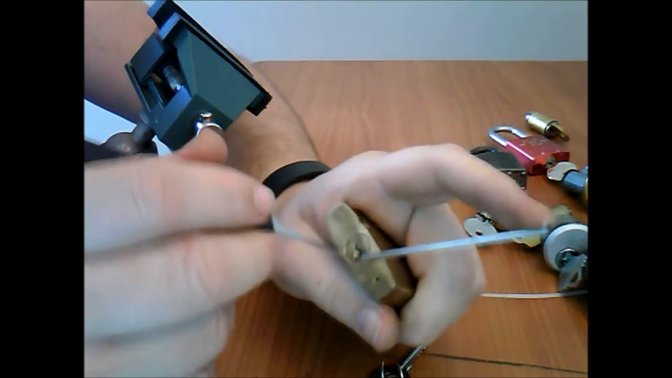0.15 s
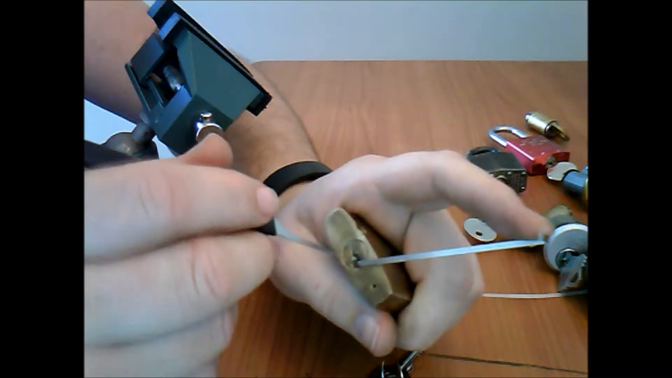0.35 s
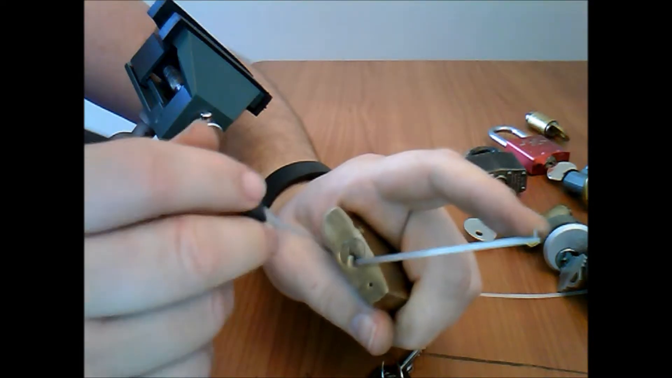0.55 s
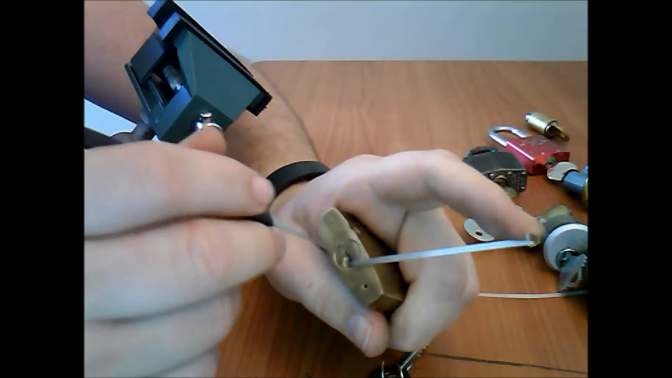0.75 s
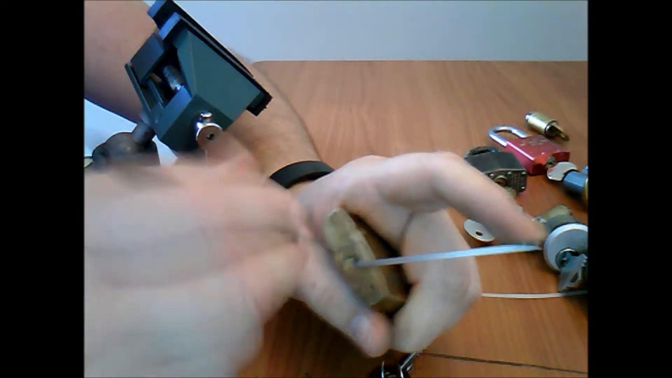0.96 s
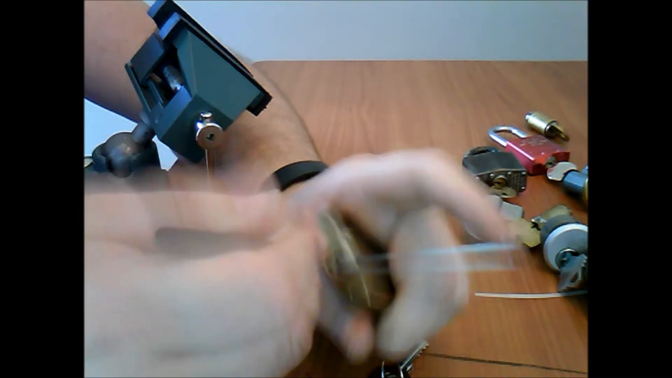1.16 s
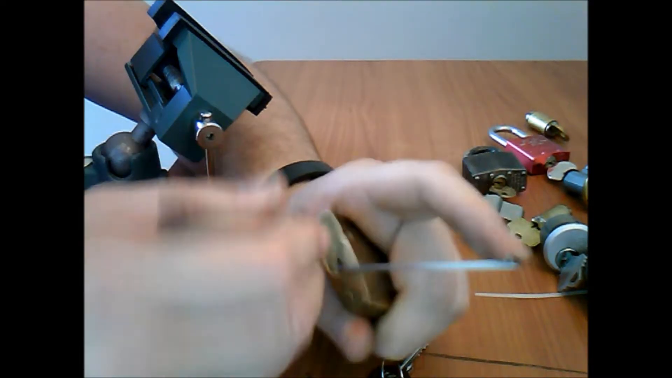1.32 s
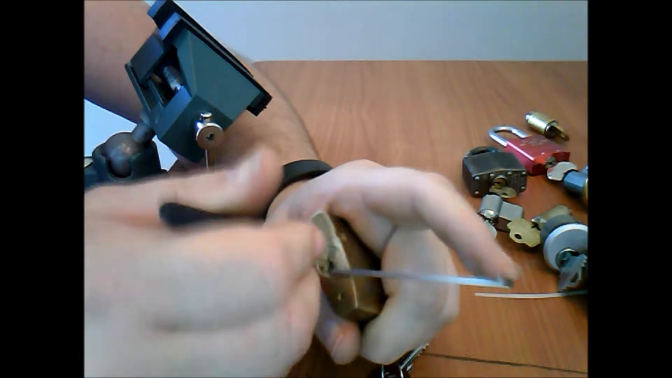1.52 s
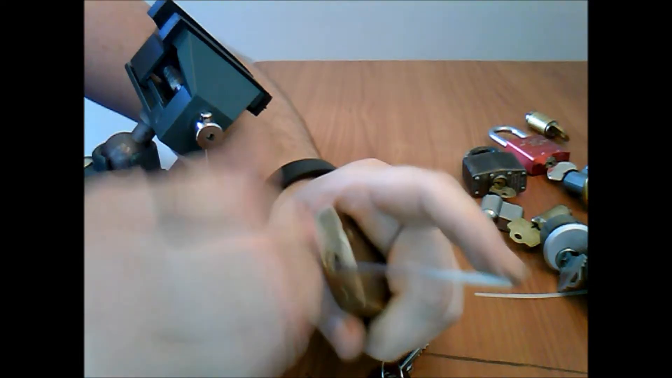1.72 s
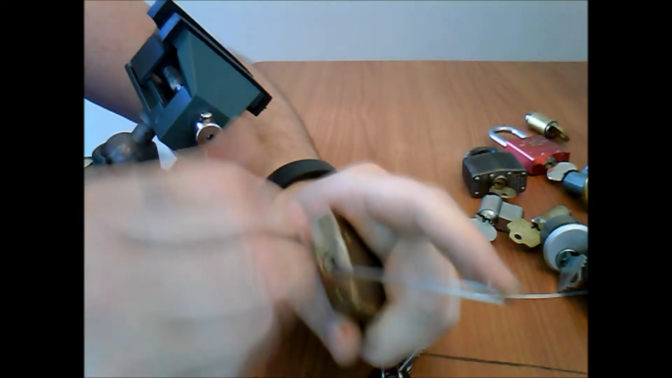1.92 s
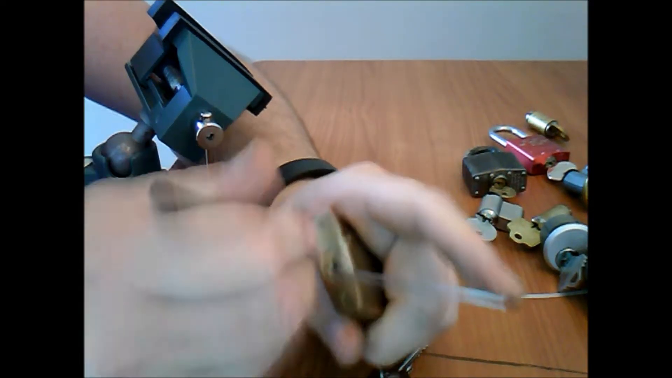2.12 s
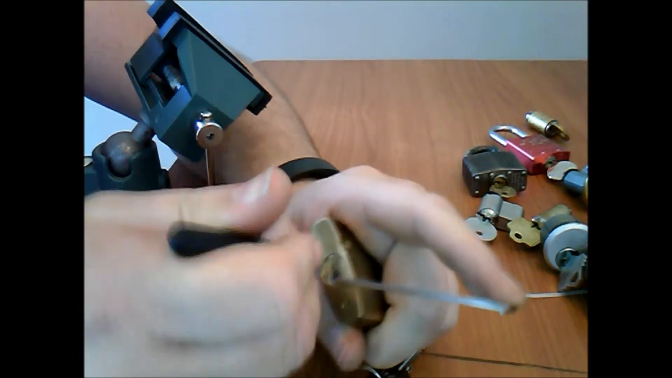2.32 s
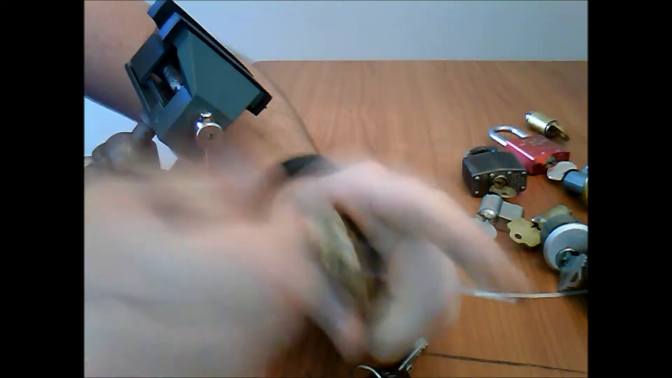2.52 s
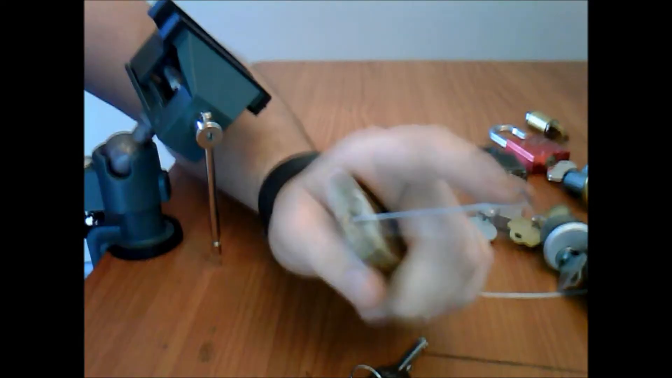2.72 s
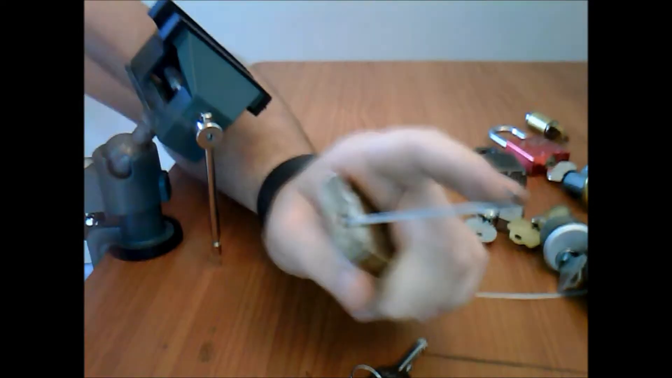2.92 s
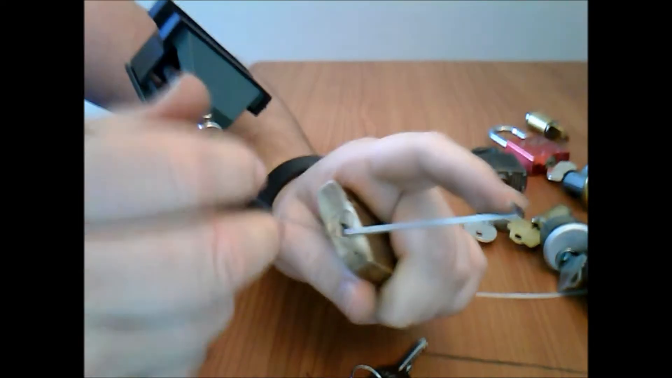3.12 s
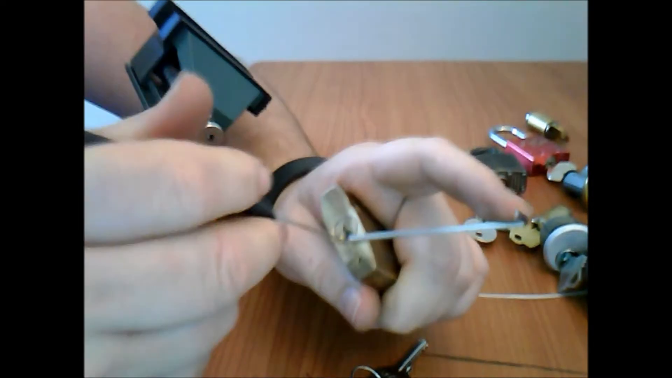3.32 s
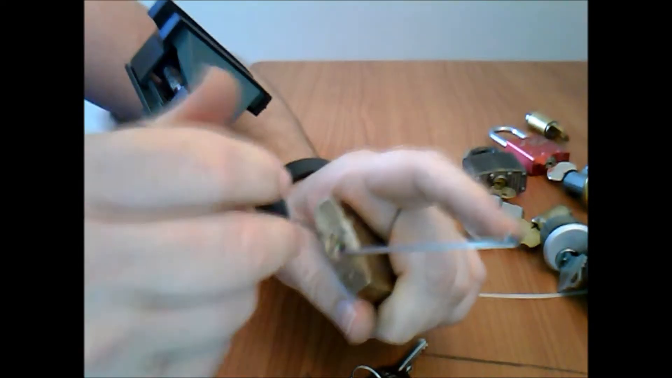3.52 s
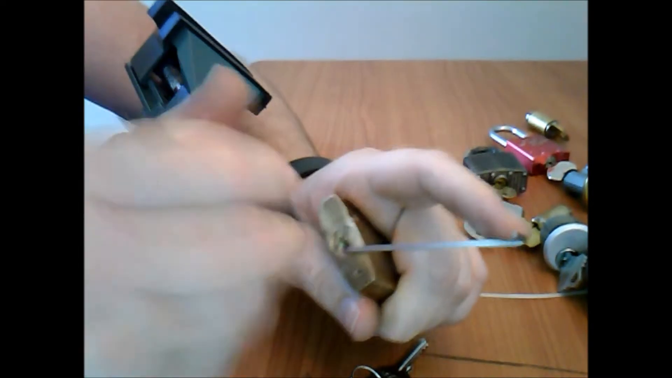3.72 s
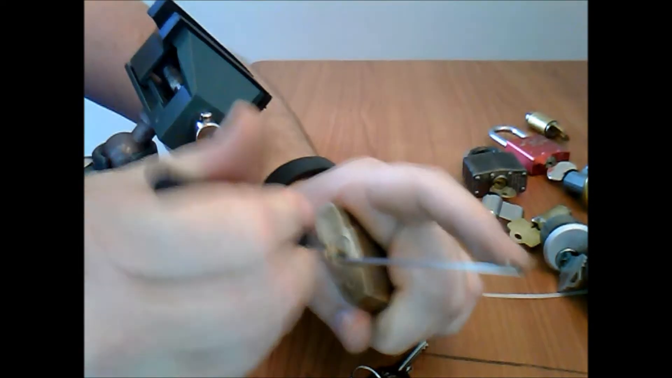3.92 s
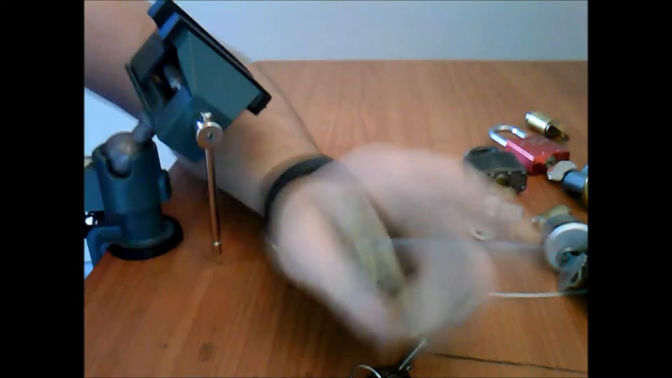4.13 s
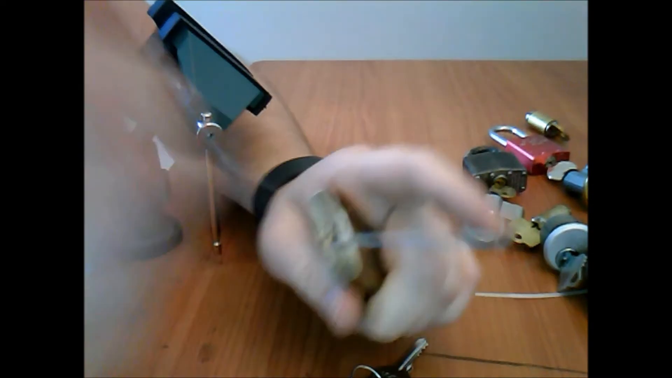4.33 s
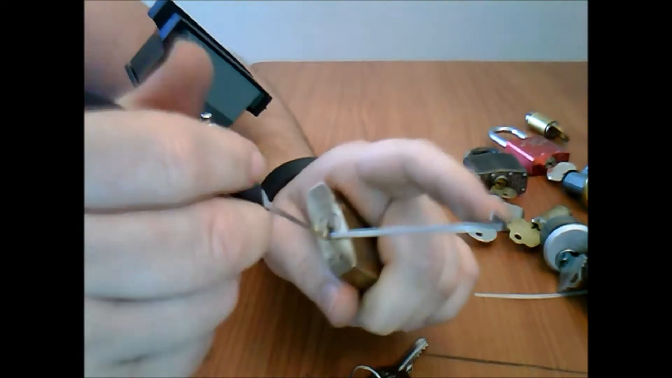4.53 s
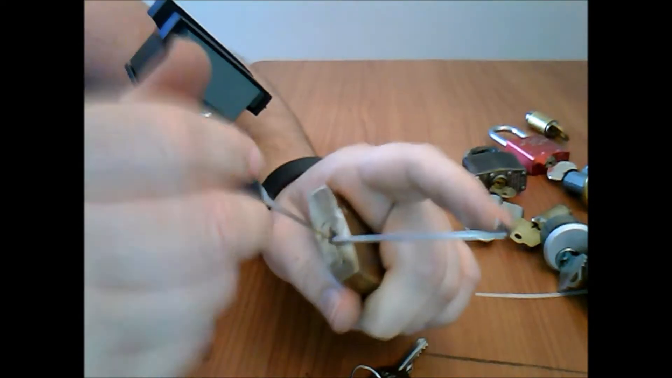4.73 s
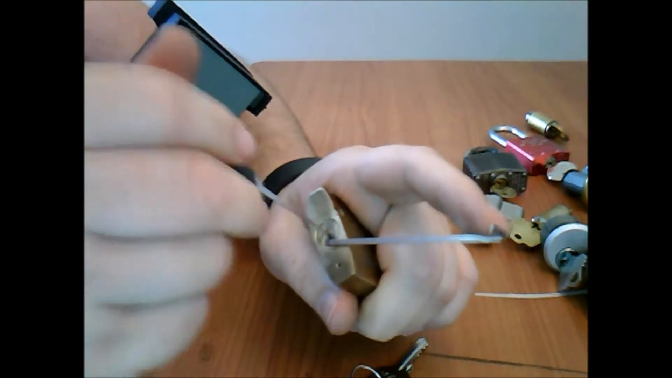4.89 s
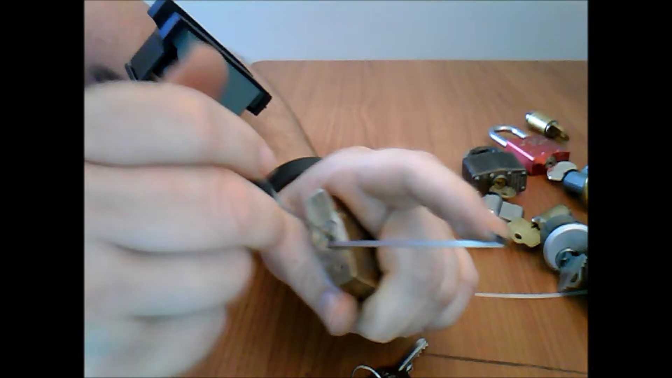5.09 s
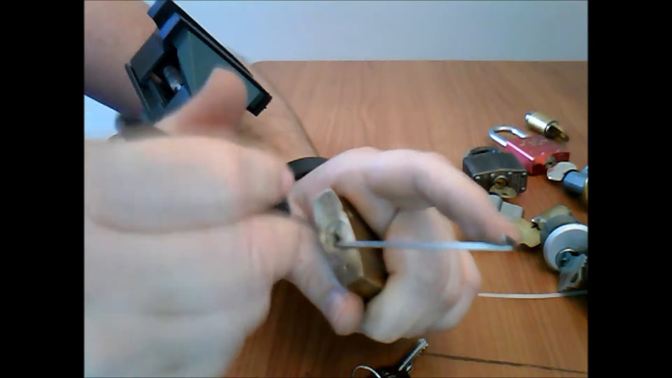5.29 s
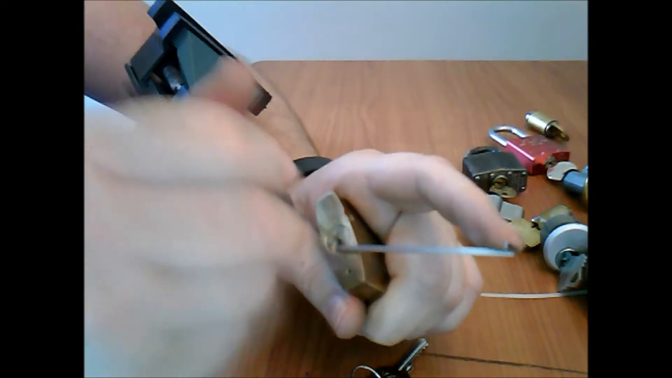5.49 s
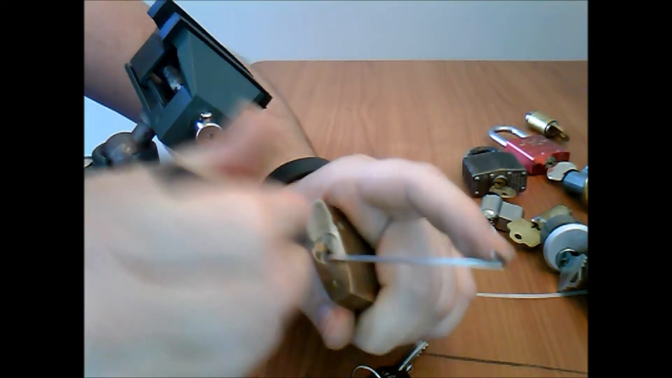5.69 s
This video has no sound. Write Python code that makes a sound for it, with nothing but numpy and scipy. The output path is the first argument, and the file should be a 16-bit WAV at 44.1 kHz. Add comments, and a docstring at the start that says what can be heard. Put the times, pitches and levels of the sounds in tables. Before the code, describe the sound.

A nearby camera microphone catches hands working a small padlock over a desk: sparse dry ticks, a violent split-second zip of steel across pins, then a cluster of low bumps and rubbing. More small clicks lead to another short zip and a soft thud, then light wrench ticks. Quiet room air, faint midrange hum and a fluttering electronic whine lie underneath, with a short room ring.

```python
"""A steel pick is ripped out across the pins of a small brass padlock: each zip is a 20 ms volley of hard snaps.
Light ticks of pick, pins and tension wrench surround the zips; every click is a noise rattle ringing metal modes.
Hands, lock and desk add damped, ringless knocks and a low rub; arm effort drives stand rumble and skin rub.
A small room rings after these sounds, over shaped noise for air, drone and rustle and a pulsing electrical whine."""
import sys
import numpy as np
from scipy import signal
from scipy.fft import rfft, irfft
from scipy.io import wavfile
from scipy.ndimage import uniform_filter1d

SR = 44100
rng = np.random.default_rng(int(sys.argv[2]) if len(sys.argv) > 2 else 0)


def store_pcm(level_fs):
    """Save levels as 16-bit WAV."""
    pcm = np.round(np.clip(level_fs, -1, 1) * 32767).astype(np.int16)
    wavfile.write(sys.argv[1], SR, np.atleast_2d(pcm).T)


N = 253575  # length in samples
SIZE = 16384  # samples in one strike or short rub
HZ = np.fft.rfftfreq(SIZE, 1 / SR)


def amp(db):
    """Decibels to gain."""
    return 10 ** (np.asarray(db) / 20)


def evened(x):
    """Scales to rms 1."""
    return x / np.sqrt(np.mean(x ** 2) + 1e-20)


def read(points, hz):
    """Reads a (Hz, value) table on a log-frequency axis."""
    f, value = np.transpose(points)
    return np.interp(np.log(hz + 1), np.log(f + 1), value)


def add(mix, s, sound):
    """Mixes a sound in at s seconds, cut off at the end of the mix."""
    part = mix[round(s * SR):][:len(sound)]
    part += sound[:len(part)]


def noise(colour):
    """Steady noise of rms 1 with the given (Hz, dB) spectrum."""
    hz = np.fft.rfftfreq(N, 1 / SR)
    spectrum = rfft(rng.standard_normal(N)) * amp(read(colour, hz))
    return evened(irfft(spectrum, N))


def drift(rate_hz):
    """Slow random wander of rms 1, mostly below the given rate."""
    hz = np.fft.rfftfreq(N, 1 / SR)
    spectrum = rfft(rng.standard_normal(N)) / (1 + (hz / rate_hz) ** 2)
    return evened(irfft(spectrum, N))


def causal(db):
    """Minimum-phase response with this gain: it starts at once and then dies away."""
    log_gain = np.log(amp(np.maximum(db, -100)))
    circle = np.concatenate([log_gain, log_gain[-2:0:-1]])
    return np.exp(np.conj(signal.hilbert(circle)))[:len(db)]


def strike(decay_ms, response, even_hz, rise, grain_db):
    """A dying rattle of clumped micro-impacts, even in spectrum, drives a response; energy 1."""
    t = np.arange(SIZE) / SR
    age = t * 1000 / max(decay_ms, .3)  # in decay times; rise is a fraction of one
    clumps = evened(uniform_filter1d(rng.standard_normal(SIZE), size=50))
    envelope = np.exp(-age) * (1 - np.exp(-age / rise))
    force = envelope * amp(grain_db * np.tanh(clumps))
    rattle = rfft(rng.standard_normal(SIZE) * force)
    # flatten the broad spectrum of the rattle so that the response sets the colour
    power = uniform_filter1d(abs(rattle) ** 2, max(int(even_hz / HZ[1]), 1))
    flatten = causal(-10 * np.log10(abs(power) + 1e-9))
    sound = irfft(rattle * flatten * response)
    sound = sound * np.cos(np.pi / 2 * t / t[-1]) ** 2  # fade out
    return sound / np.linalg.norm(sound)


# Steady room air and hiss. Each row: frequency in Hz, relative level in dB.
AIR_COLOUR = [(20, 7.5), (50, -8.5), (85, -9), (125, 4.5), (170, -8.5), (400, -6.5), (750, -12),
              (1400, -18), (3700, -29.5), (4700, -42.5), (9000, -34), (11500, -50), (15000, -57.5),
              (16500, -73.5)]


def air(level_db=-60.0, swell_db=1.47):
    """Room air and hiss: shaped noise whose level gently swells."""
    return amp(level_db + swell_db * drift(3.7)) * noise(AIR_COLOUR)


# Swells of the faint drone. Each row: middle in seconds, half width (to 1/e) in seconds, level in dB.
DRONE_SWELLS = [(.59, 0.015, -63.5), (2.18, 0.065, -63.5), (3.81, 0.018, -56.5), (4.421, 0.11, -69),
                (4.91, .03, -57), (5.19, 0.12, -62.5), (5.479, 0.045, -64)]


def drone(between_db=-72.5, waver_db=2.0):
    """A faint drone near 580 Hz: narrow noise under bell-shaped swells and a slow waver."""
    t = np.arange(N) / SR
    hum = noise([(300, -34.0), (460, -12.0), (575, 9), (700, -5.5), (1050, -24.5), (1500, -57)])
    level = amp(between_db)
    for s, width, db in DRONE_SWELLS:
        level = level + amp(db) * np.exp(-((t - s) / width) ** 2)
    return level * amp(waver_db * drift(0.73)) * hum


def rustle(level_db=-77, swing_db=3):
    """Fingers rustle softly on the tools: treble noise of swinging level."""
    skin = noise([(1000, -26.5), (2400, -3.5), (3600, -1), (4600, -6.5), (6500, -7.0), (11000, -22.5)])
    return amp(level_db + swing_db * drift(8)) * skin


# Electrical tones. Each row: frequency in Hz, level in dB while switched on.
WHINE_TONES = [(5960, -83.5), (8000, -76), (10000, -80.5), (12000, -92.5), (14000, -94)]


def whine(duty=0.47, fuzz_rad=0.55, hiss_db=-77):
    """The electronics whine: fuzzy high tones and a little hiss switch on and off about ten times a second."""
    first_s, period_s = .09, .0993
    pause_start_s, pause_end_s = 4.61, 4.8
    t = np.arange(N) / SR
    turns = (t - first_s) / period_s + 0.1 * drift(6.9)
    pulsing = abs((turns + .5) % 1 - .5) < duty / 2
    on = pulsing & ((t < pause_start_s) | (t > pause_end_s))
    tones = np.zeros(N)
    for hz, db in WHINE_TONES:
        phase = 2 * np.pi * hz * t + fuzz_rad * drift(120)
        tones += amp(db) * np.sqrt(2) * np.cos(phase) * (1 + 0.17 * drift(60))
    hiss = amp(hiss_db) * noise([(2000, -14.0), (5500, 1), (8000, 3.5), (10000, -3.5), (12000, -10.0), (15000, -17)])
    gate = uniform_filter1d(1. * on, size=300)  # 7 ms ramps
    return gate * (tones + hiss)


# Pushes and jerks of the arms. Each row: start in seconds, length before release in seconds, effort in dB.
ARM_MOVES = [(1.033, 0.11, -53), (1.366, 0.1, -50.5), (1.79, 0.27, -50), (2.302, 0.023, -48.5),
             (2.54, 0.41, -36.5), (2.811, 0.58, -35.5), (3.684, 0.14, -51.5), (4.071, 0.22, -38.5),
             (4.386, 0.045, -47)]


def effort(attack_s=.025, sag_db_per_s=22.5, release_s=0.11, tremor_db=-64):
    """How hard the arms move: a tremor, plus an attack, a tiring hold and a release for each move."""
    t = np.arange(N) / SR
    power = amp(tremor_db) ** 2
    for start, length, db in ARM_MOVES:
        age = np.maximum(t - start, 0)
        attack = np.minimum(age / attack_s, 1)
        release = np.exp(-np.maximum(age - length, 0) / release_s)
        power = power + (attack * release * amp(db - sag_db_per_s * age)) ** 2
    return np.sqrt(power)


# Low rumble of the camera stand. Each row: frequency in Hz, relative level in dB.
SHAKE_COLOUR = [(12, -46.5), (20, -6.5), (48, 0.5), (91, -1.5), (130, -3.5), (165, -17), (203, -13),
                (261, -16), (400, -17.5), (520, -39.5), (880, -120)]
# Skin rubbing over the desk. Each row: frequency in Hz, relative level in dB.
RUB_COLOUR = [(100, -16.5), (190, -2.5), (300, 3), (600, 0.5), (1100, -9.5), (2000, -16.5), (5000, -42)]


def handling(shake_db=-1.0, rub_db=-17, uneven_db=4.5, firm_db=-36, grip=0.46):
    """The camera stand rumbles with the effort; skin rubs in uneven slips, gaining faster on firm moves."""
    push = effort()
    shake = amp(shake_db) * noise(SHAKE_COLOUR)
    firmness = (push / amp(firm_db)) ** grip
    rub = firmness * amp(rub_db + uneven_db * drift(40)) * noise(RUB_COLOUR)
    return push * (shake + rub)


# Dull knocks of lock, hands and desk, and one longer low rub at 3.285 s.
# Each row: start in seconds, energy in dB, decay in ms, centre in Hz.
KNOCKS_AND_RUB = [(1.9267, -19, 1.7, 630), (1.939, -14.5, 19.5, 1050), (2.115, -19.5, 15, 1200),
                  (2.5438, -4.5, 8.4, 800), (2.5565, -0.5, 5.6, 404), (2.5958, -2.5, 5.6, 1000),
                  (2.5965, 2.5, 4.8, 367), (2.601, 4.5, 8.6, 80.5), (2.6106, -3.5, 8.6, 870),
                  (2.628, -22, 9, 272), (2.721, -1.5, 4.4, 68), (2.783, -22, 18, 1000),
                  (2.808, -15.5, 8.8, 860), (2.835, -10.5, 13.6, 700), (2.841, 3.5, 15.4, 91),
                  (2.846, -3, 22, 320), (2.917, -13, 11, 337), (2.991, -7, 8.4, 86.4),
                  (2.991, -21.5, 10, 1070), (3.079, -28, 12, 1310), (3.217, -28.5, 18, 1160),
                  (3.285, -13.5, 49, 300), (4.104, -4, 2.2, 430), (4.213, 0.5, 9.3, 74.4),
                  (4.277, -30, 21, 1480), (5.677, -21, 4.8, 88)]


def knocks_and_rub():
    """Flesh damps these knocks and the rub: each is one broad hump of sound with no ring."""
    out = np.zeros(N)
    for s, db, decay_ms, hz in KNOCKS_AND_RUB:
        ratio = (HZ + 1) / hz
        hump_db = -10 * np.log10(1 + (.6 / ratio) ** 4 + (ratio / 1.35) ** 8)
        add(out, s, amp(db) * strike(decay_ms, causal(hump_db), even_hz=hz, rise=0.048, grain_db=2))
    return out


def ringing(modes):
    """The frequency response of one metal part: a few short-lived modes."""
    response = 0
    for hz, width, db in modes:
        response = response + amp(db) * 1j * HZ * width / (hz ** 2 - HZ ** 2 + 1j * HZ * width)
    return response


# The bare click of steel on brass. Each row: frequency in Hz, relative level in dB.
STEEL_CLICK = [(100, -26.5), (500, -2.5), (1200, -2), (2600, 1.5), (5000, 0.5), (9000, -7), (10500, -10.5),
               (16000, -28.5)]


def contact(db, decay_ms, tilt_db, rings, uneven_db=3.0, pressed_db=-15, spread_s=.0003, hardness=0.27):
    """A steel click that sets the given metal parts ringing."""
    octaves = np.log2((np.minimum(HZ, 8000) + 500) / 3500)  # about 3 kHz, levelling off at 8 kHz
    # bending waves in thin steel carry the treble faster, which smears each click; spread is the lag at 3 kHz
    travel = np.exp(-4j * np.pi * spread_s * np.sqrt(HZ * 3000))
    # light touches land on a different spot each time, which ripples their colour
    spot = evened(signal.fftconvolve(rng.standard_normal(len(HZ)), np.hanning(SIZE // 48), "same"))
    ripple_db = uneven_db * spot * (db < pressed_db)
    # a harder blow has a shorter contact and reaches further into the top octave
    top = np.interp(HZ, [9500, 12000], [0, 1])
    top_db = hardness * (db - pressed_db) * top
    click = causal(read(STEEL_CLICK, HZ) + tilt_db * octaves + ripple_db + top_db)
    response = click * (1 + rings) * travel
    return amp(db) * strike(decay_ms, response, even_hz=1590, rise=0.18, grain_db=7.0)


# Modes of the lock body, the pins, the tension wrench and the pick blade.
# Each row: frequency in Hz, width in Hz, relative level in dB.
BODY_MODES = [(1900, 330, -1)]
PIN_MODES = [(2830, 1100, 2.1), (4800, 750, -4)]
WRENCH_MODES = [(2320, 190, -8), (3870, 180, 0.5), (6180, 640, -12)]
BLADE_MODES = [(6570, 300, -14.5), (7760, 940, -0.5), (9000, 290, -19)]
# Light touches of steel on the lock. Each row: start in seconds, energy in dB, rattle decay in ms,
# tilt in dB per octave, part touched, ring of that part in dB.
TOUCHES = [(0.055, -23.5, 0.94, -6.5, "pins", 23), (0.566, -35.5, 24, 3, "wrench", 9),
           (0.995, -32, 12, 8.5, "pins", 14), (1.017, -31.5, 21, 7, "pins", 14),
           (1.1714, -25, 3.3, -6, "pins", 1), (1.182, -30.5, 9.3, -5.5, "pins", -8),
           (1.1952, -24.5, 3.7, 8.5, "pins", 16), (1.218, -27.5, 0.92, -1.5, "pins", -3),
           (1.584, -30, 7.2, 8, "pins", 3), (1.7033, -21.5, 1.2, 3, "pins", 8),
           (1.879, -35, 1.6, 0, "body", 20), (1.9002, -30, 1.3, -6.5, "blade", 15),
           (1.9253, -21.5, 1.2, 3, "pins", 36), (2.0051, -27.5, 2.1, -4, "body", 1),
           (2.16, -29.5, 5.3, -10, "blade", 14), (2.3476, -32, 4.8, -6, "blade", 4),
           (2.387, -13, 1.34, 3, "body", 9.5), (2.469, -34.5, 1.8, -6, "blade", 5),
           (2.612, -8, 0.55, -6, "body", 0), (2.615, -8.5, 2.4, -4, "blade", -11),
           (2.645, -17, 22, -15.5, "pins", 1), (2.784, -25.5, 15, -6, "pins", -8),
           (3.0637, -31.5, 6.6, -7, "pins", 23), (3.0761, -22.5, 10.6, -6, "pins", 9),
           (3.097, -26, 4.2, -3, "blade", 8), (3.208, -21.5, 9.5, -3.5, "pins", 10),
           (3.26, -29.5, 1.8, -6.5, "blade", 8), (3.361, -23, 3.9, -6, "wrench", 33),
           (3.373, -23, 2.3, 1.5, "wrench", 12), (3.409, -31, 5.7, 14, "wrench", 25),
           (3.526, -33.5, 0.94, 8, "wrench", 30), (3.743, -29, 10, 20.5, "pins", 34),
           (3.8843, -39.5, 1.9, 11.5, "pins", 28), (3.96, -27, 3.4, 1.5, "body", 9),
           (4.0616, -32, 15, -4.5, "body", 2), (4.2567, -33, 5.4, -2, "body", 5),
           (4.298, -40, 2.5, -3, "pins", -8), (4.5638, -24.5, 2.1, -2, "wrench", 11),
           (4.571, -25, 2.3, 0.5, "body", 21), (4.669, -26.5, 2.9, -8.5, "wrench", 39),
           (4.8183, -31.5, 2.2, .5, "wrench", 34), (4.8475, -23.5, 3.9, 5, "wrench", 37),
           (4.9423, -34.5, 9.8, -1, "body", 8), (4.9644, -28, 2.6, 8, "wrench", 37),
           (5.3619, -33.5, 3.5, 6, "wrench", 7), (5.5264, -32, 6.4, 1, "body", -3.5),
           (5.546, -30, 13, 2, "body", 0.5), (5.5606, -28.5, .66, 7, "body", 18)]


def pick(blade_db=3):
    """The pick is fed in and felt about: each touch rings the blade and one part of lock or tools."""
    out = np.zeros(N)
    parts = {"body": BODY_MODES, "pins": PIN_MODES, "wrench": WRENCH_MODES, "blade": BLADE_MODES}
    blade = amp(blade_db) * ringing(BLADE_MODES)
    for s, db, decay_ms, tilt_db, part, ring_db in TOUCHES:
        rings = blade + amp(ring_db) * ringing(parts[part])
        add(out, s, contact(db, decay_ms, tilt_db, rings))
    return out


# The pick snapping over the pins in a zip. Each row: start in seconds, energy in dB,
# rattle decay in ms (0.3 at least is played), ring of the lock body in dB.
SNAPS = [(2.5373, -11, 1.1, -12), (2.542, 0, 5.4, -7.5), (2.553, 0, 0.9, -8), (2.5561, 5.5, 0.67, 12),
         (4.085, -3.5, 0.97, -15.5), (4.0889, 2, 2.1, -9), (4.1, 0, 0.27, -9), (4.1032, 3, 0.83, 21)]


def zips(tilt_db_per_octave=-3, pins_db=-7, blade_db=18.5):
    """The pick is ripped out: every snap rings blade and pins, and the last of a volley jars the lock body."""
    out = np.zeros(N)
    tools = amp(pins_db) * ringing(PIN_MODES) + amp(blade_db) * ringing(BLADE_MODES)
    for s, db, decay_ms, body_db in SNAPS:
        rings = tools + amp(body_db) * ringing(BODY_MODES)
        add(out, s, contact(db, decay_ms, tilt_db_per_octave, rings))
    return out


# How long the room rings. Each row: frequency in Hz, time to fall by 60 dB in seconds.
ROOM_T60 = [(100, 0.39), (500, 0.54), (2000, 0.2), (4500, 0.27), (8000, 0.25), (15000, .16)]
# Colour of the room tail at its start. Each row: frequency in Hz, relative level in dB.
ROOM_COLOUR = [(100, -2), (500, -10), (1500, -1.5), (4000, 2), (8000, -3.5), (15000, 6)]
# Echoes from the desk and things on it. Each row: delay in seconds, level in dB.
DESK_ECHOES = [(.0019, -43), (.0052, -18), (.0074, -24), (0.0114, -16)]


def room(x, wet_db, build_s=0.0025):
    """A few hard echoes from the desk, and a short noise tail that dies band by band."""
    t = np.arange(SR // 2) / SR
    hz, when, bands = signal.stft(rng.standard_normal(len(t)), SR, nperseg=256)
    start_db = read(ROOM_COLOUR, hz)[:, None]
    fall_db = 60 * when / read(ROOM_T60, hz)[:, None]
    tail = signal.istft(bands * amp(start_db - fall_db), SR, nperseg=256)[1][:len(t)]
    tail = tail * (1 - np.exp(-t / build_s))
    response = amp(wet_db) * tail / np.linalg.norm(tail)
    for delay, db in DESK_ECHOES:
        add(response, delay, amp([db]))
    return x + signal.fftconvolve(x, response)[:N]


def scene():
    """Zips, knocks and the low rub share one room, light touches ring a little wetter, over handling and floor."""
    floor = air() + drone() + rustle() + whine()
    touches = room(pick(), wet_db=-5.5)
    zips_and_knocks = room(zips() + knocks_and_rub(), wet_db=-6.5)
    return (floor + handling() + touches + zips_and_knocks)[None]


def record(dry):
    """The band limit of the camera: a steep low-pass at 15.9 kHz."""
    lowpass = signal.firwin(511, 15900, window=("kaiser", 9), fs=SR)
    return signal.oaconvolve(dry, lowpass[None], "same")


dry = scene()
out = record(dry)
store_pcm(out)
```